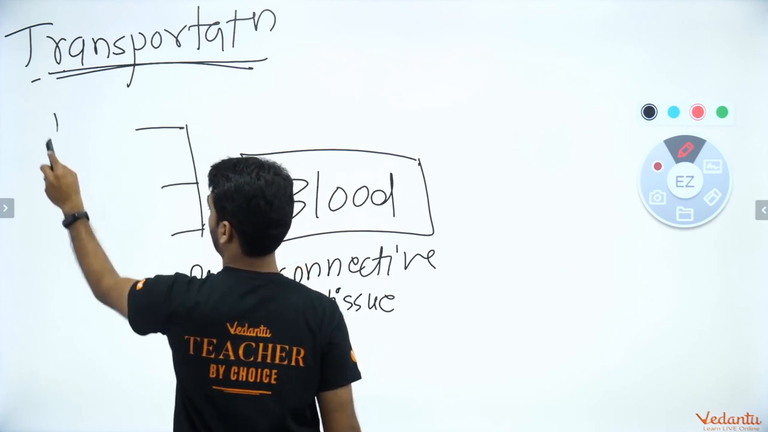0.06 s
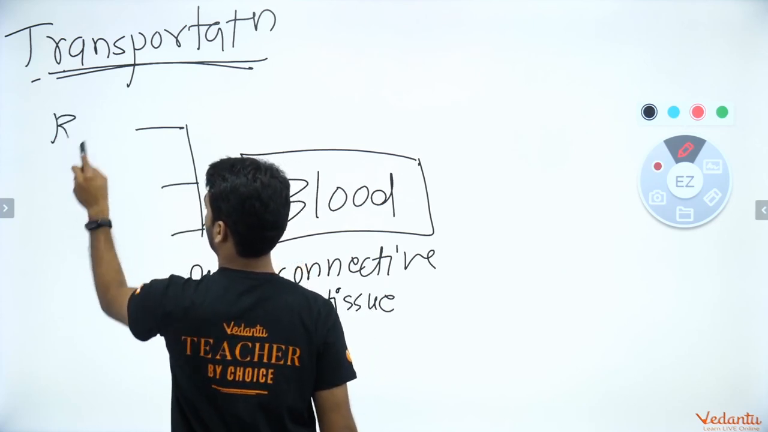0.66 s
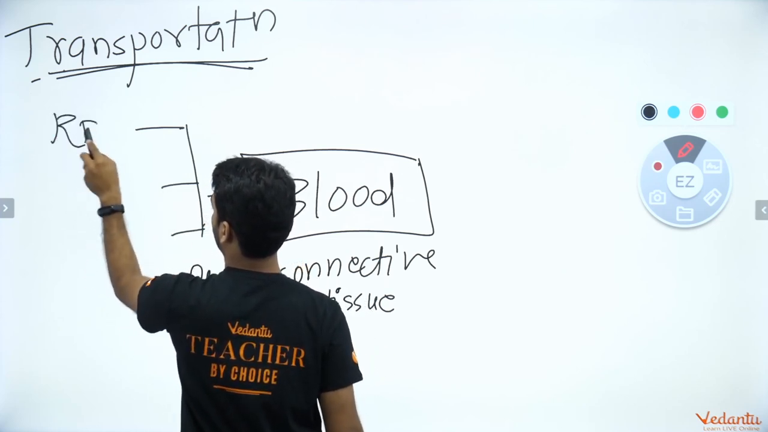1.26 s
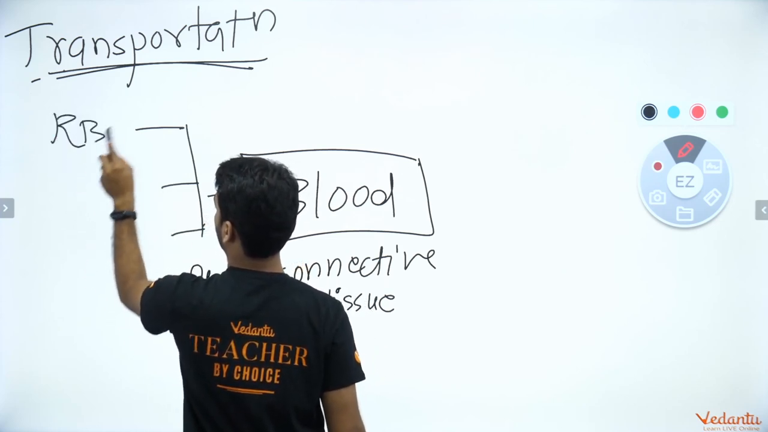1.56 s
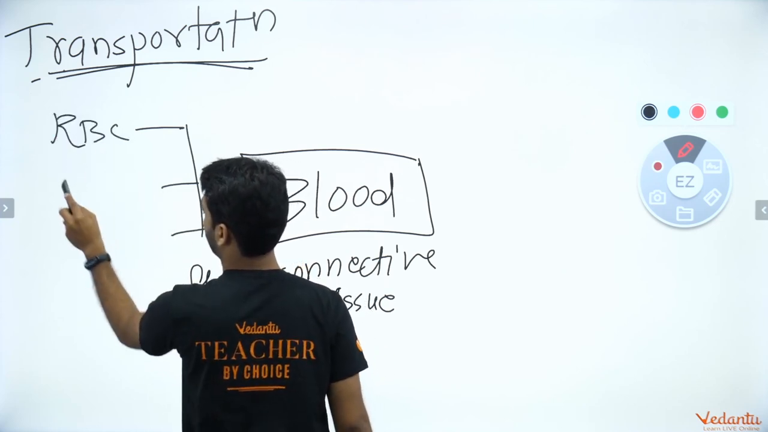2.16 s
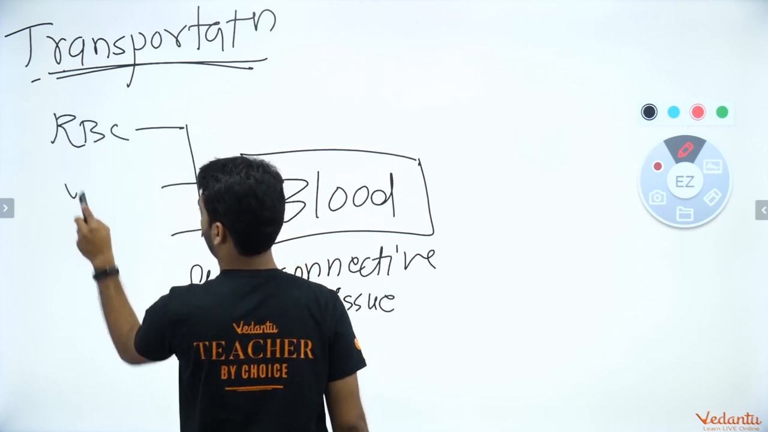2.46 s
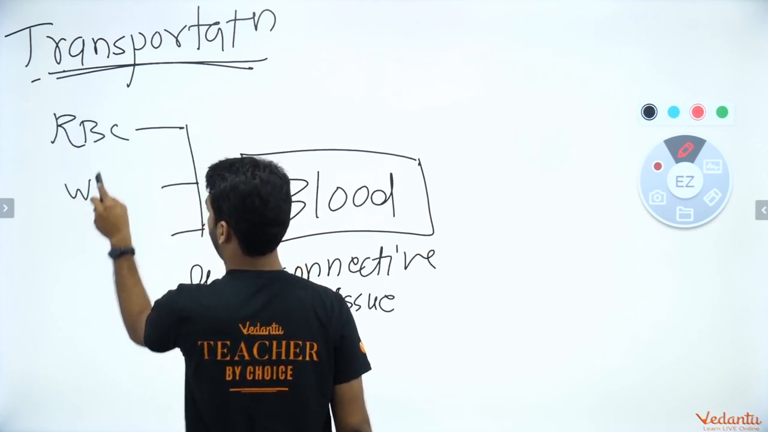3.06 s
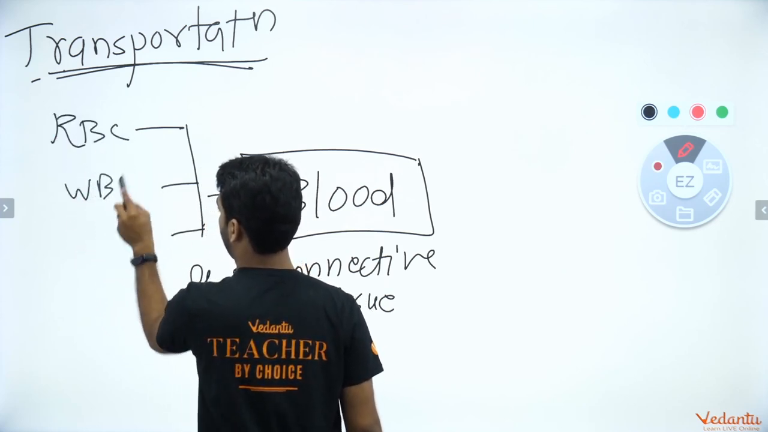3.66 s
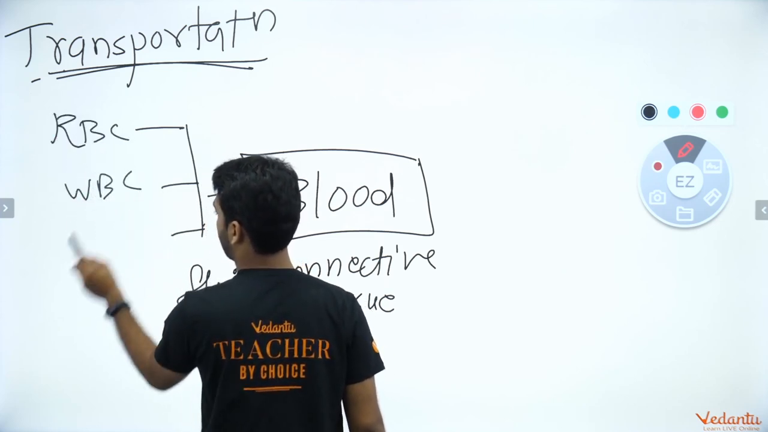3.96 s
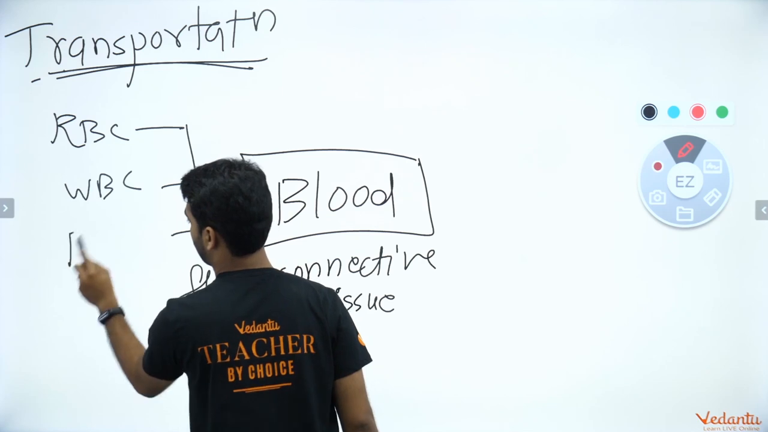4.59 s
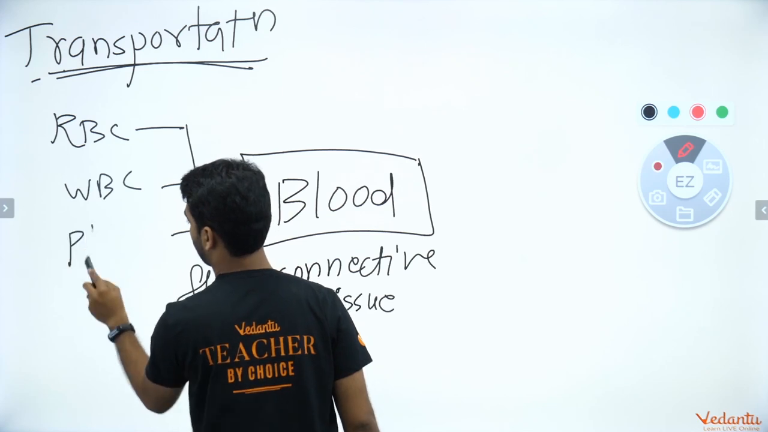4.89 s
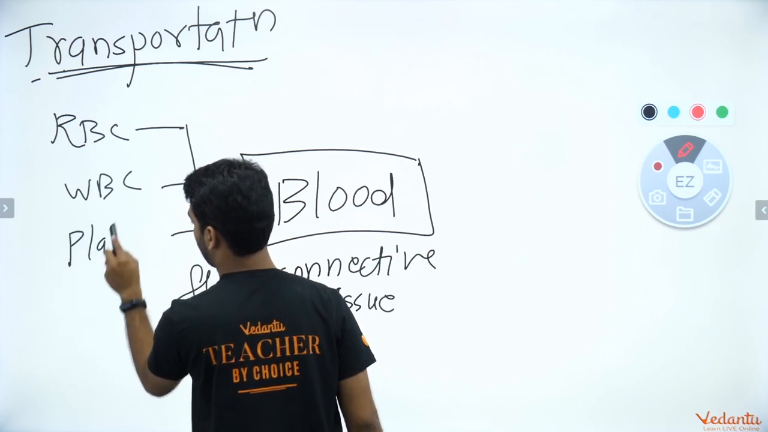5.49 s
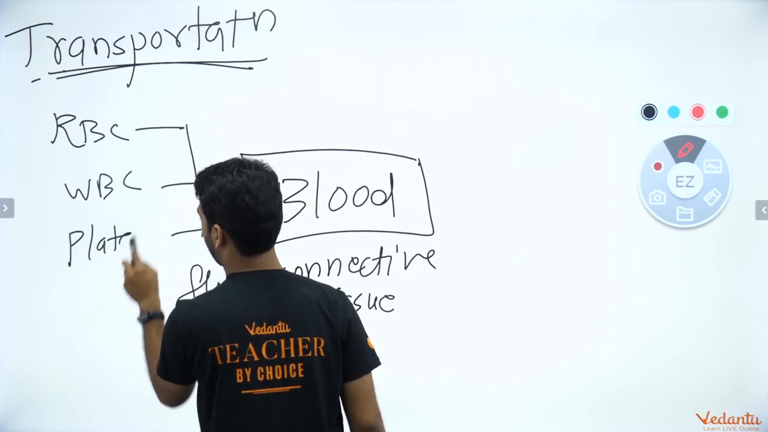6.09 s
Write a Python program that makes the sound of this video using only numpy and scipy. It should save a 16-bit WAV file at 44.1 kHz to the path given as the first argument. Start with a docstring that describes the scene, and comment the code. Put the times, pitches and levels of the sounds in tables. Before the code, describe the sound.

Close by, a pen tip knocks irregularly against a big board as letters are written one after another. Each clicking tap makes the panel resonate briefly and is followed by soft, scratchy strokes. The taps thin out a little in the middle and come closer together towards the end. Behind them is the faint, steady rumble and hum of classroom ventilation.

```python
"""A low hum and the dying boom of a large wall-mounted touch board sound in a quiet classroom.
Close by, a hard plastic stylus writes letters: friction makes its tip hiss faintly along each stroke.
Each touchdown is an impact that knocks the panel, clacks the pen's barrel and rattles its nib;
bending waves then spread, reflect from the frame and make the whole board boom briefly."""
import sys
import numpy as np
from scipy import signal
from scipy.fft import rfft, irfft, next_fast_len
from scipy.io import wavfile
from scipy.ndimage import map_coordinates

SR = 44100
rng = np.random.default_rng(int(sys.argv[2]) if len(sys.argv) > 2 else 0)


def pcm_store(signal):
    """Save signal as 16-bit PCM."""
    levels = np.round(np.clip(np.atleast_2d(signal), -1, 1) * 32767)
    wavfile.write(sys.argv[1], SR, levels.astype(np.int16).T)


N = 279281
T = np.arange(N) / SR
RING, SHORT = T[:SR], T[:SR // 16]  # seconds since an impact, for long and short decays

# spectrum of the ventilation: frequency_hz, density_db
AIR_SPECTRUM = [(20, -15), (40, -0.5), (58, -10), (80, 2.5), (105, -18.5), (160, -14.5), (250, -13.5),
                (350, -19.5), (550, -31.5), (800, -29), (1300, -38.5), (3000, -46), (8000, -50),
                (16000, -55.5)]
# spectrum of the dense ring of board and room: frequency_hz, density_db
BOOM_SPECTRUM = [(50, -23), (110, 2), (200, 0.5), (380, 0), (460, -4.5), (650, -6), (850, 1), (1080, -1.5),
                 (1300, -9), (1700, -16), (2200, -17), (2900, -22.5), (5500, -26), (9000, -31),
                 (15000, -26)]
# decay of that ring: frequency_hz, t60_s
BOOM_DECAY = [(100, 0.7), (400, 0.49), (900, 0.27), (2000, 0.29), (6000, 0.24), (14000, 0.037)]
# long modes of the whole board: pitch_hz, level_db, t60_s
BOARD_MODES = [(71.9, -37.5, 0.6), (116.4, -32, 0.84), (140.6, -33, 0.43), (197.6, -36.5, 1),
               (216.4, -30.5, 0.56), (230.7, -32, 0.52), (266.6, -37, 0.53), (293.2, -29.5, 0.43),
               (330, -53.5, 0.32), (376, -33.5, 0.38), (416.6, -39, 0.43), (524.5, -23, 0.16),
               (560, -44, 0.83), (750, -34.5, 0.32)]
# strokes of the sliding tip: start_s, end_s, level_db
STROKES = [(0.015, 0.174, -59), (0.327, .45, -56), (0.459, 0.555, -54.5), (0.575, 0.657, -57),
           (0.661, 0.792, -54), (0.928, 1.055, -59.5), (1.185, 1.294, -53.5), (1.3, 1.385, -59),
           (1.389, 1.478, -54), (1.495, 1.564, -54.5), (1.72, 1.84, -62), (1.829, 1.909, -51),
           (2.313, 2.767, -62), (2.932, 3.05, -60.5), (3.089, 3.21, -58.5), (3.208, 3.295, -54.3),
           (3.316, 3.383, -61), (3.389, 3.455, -52), (3.46, 3.547, -59.5), (3.74, 3.888, -53),
           (4.32, 4.46, -58.5), (4.594, 4.758, -58), (4.903, 5.027, -58.5), (5.18, 5.371, -60.5),
           (5.41, 5.493, -61.5), (5.672, 5.771, -55.5), (5.9, 6.2, -58)]
# spectra of the rubbed panel and the hissing tip: frequency_hz, density_db
RUB_SPECTRUM = [(300, -3), (750, 7), (1100, 0.5), (1400, 5), (1850, -10.5), (2150, -8), (2500, -8),
                (3050, -5.5), (4000, -16), (8000, -41), (16000, -20)]
HISS_SPECTRUM = [(2000, -56), (4200, -1), (5400, 0.5), (6000, 3), (7200, -15.5), (9400, 1.5), (10600, -6.5),
                 (11700, -4), (13000, -6), (15000, -6), (16000, -13)]
# gain of the hiss's top octave: time_s, gain_db
HISS_SHEEN = [(0, 6.5), (1.8, -6), (2.9, -2), (4.4, 7), (5.3, 0), (6.1, -1)]
# the sliding nib's resonance, shifting with the grip: time_s, pitch_hz
GRIP_PITCH = [(0, 6800), (1.8, 7230), (3.85, 7500), (4.3, 6620), (6.2, 6370)]
# touchdowns of the pen: start_s, force_db, ring_db, ring_hz, clack_db, crack_db, nib_hz, nib_db
TOUCHDOWNS = [(0.3104, -12, -37, 1130, 2.5, 1, 6050, -9), (0.9112, -8, -8.7, 890, 11, -11, 6160, 3),
              (1.1571, -7, -11, 890, -1.5, -0.5, 8400, -9.5), (1.7068, -8.5, -11.5, 855, 0, -2, 8500, -10),
              (2.2891, -8, -19, 1020, 1.5, 0.5, 6460, -4.5), (2.909, -5, -13, 816, -9, -0.5, 4900, -3.5),
              (3.7191, -4, -9.5, 845, 3.5, -1, 6200, 0.5), (4.2977, -7, -19, 970, 4.5, -5, 5500, 0),
              (4.5862, -5.5, -25, 955, 2.5, -23, 5170, 2), (4.8761, -5.5, -13, 935, -9, 6.5, 5700, -3),
              (5.1545, -5, -8.5, 898, -3.5, -6.5, 5960, 2.3), (5.649, -3, -8.5, 885, 3.5, 8, 6800, 4),
              (5.8861, -6, -7, 882, 0, -15, 5500, -1.5), (6.3147, -1.5, -12.5, 834, 2, 10.5, 6470, 3)]
# modes of the pen's barrel at medium contact stiffness: pitch_hz, level_db, t60_s
BARREL_MODES = [(1360, -14.5, 0.0063), (1726, -23, 0.0084), (1958, -23, 0.015)]
# spectra of the contact's crack, its sharp edge and the nib's rattle: frequency_hz, density_db
CRACK_SPECTRUM = [(1700, 1), (2300, -28), (2750, 7.5), (3800, 2), (4600, -2.5), (8000, -5), (15500, -27)]
EDGE_SPECTRUM = [(5000, -9.5), (10000, -1.5), (15000, -11), (16000, 2)]
RATTLE_SPECTRUM = [(2500, -33), (4200, -4), (5000, 10.5), (7700, 5), (9500, -1), (12000, -52), (15500, -11)]


def undb(db):
    """Decibels to amplitude gain."""
    return 10 ** (np.asarray(db) / 20)


def unit(x):
    """Scale to rms 1."""
    return x / np.sqrt(np.mean(x ** 2))


def along(points, hz):
    """Interpolate (frequency_hz, value) points on a log-frequency axis."""
    f, value = np.transpose(points)
    return np.interp(np.log(np.maximum(hz, 1)), np.log(f), value)


def colour(x, points):
    """Spectral shaping: filter x by (frequency_hz, gain_db) points."""
    size = next_fast_len(len(x))
    gain = undb(along(points, np.arange(size // 2 + 1) * SR / size))
    return irfft(rfft(x, size) * gain, size)[:len(x)]


def resonate(x, hz, width_hz):
    """A second-order resonance, gain 1 at its centre."""
    return signal.lfilter(*signal.iirpeak(hz, hz / width_hz, fs=SR), x)


def fade(t, t60):
    """Exponential decay, 60 dB down after t60 seconds."""
    return np.exp(-np.log(1000) * t / t60)


def mode(t, hz, t60):
    """Damped free vibration; the blow pushes inwards first."""
    return -np.sin(2 * np.pi * hz * t) * fade(t, t60)


def burst(points, t60):
    """A transient of shaped noise with exponential decay."""
    return unit(colour(rng.standard_normal(len(SHORT)), points)) * fade(SHORT, t60)


def walk(rate):
    """Random fluctuation through `rate` points a second, spread near 1."""
    return 1.2 * np.interp(T * rate, np.arange(N // 64), rng.standard_normal(N // 64))


def add(out, start_s, x):
    """Superpose x on out from start_s."""
    i = int(round(start_s * SR))
    out[i:i + len(x)] += x[:len(out) - i]


def ventilation(air_db=-41, hum_db=-49, hum_hz=72.9, swell_db=1, waver_db=3):
    """Broadband rumble under a low hum that wavers by amplitude and phase modulation."""
    air = unit(colour(rng.standard_normal(N), AIR_SPECTRUM)) * undb(swell_db * walk(3.53))
    phase = 2 * np.pi * hum_hz * T + walk(3.8)
    hum = unit(np.sin(phase) * undb(waver_db * walk(5)))
    return undb(air_db) * air + undb(hum_db) * hum


def board_boom(dense_db=-23, modes_db=-1, spread_s=0.0024, fill_s=0.014, place_db=2):
    """Bending waves reflect from the frame into standing waves, weighted by the spot that is struck."""
    spectrum = rfft(unit(colour(rng.standard_normal(len(RING)), BOOM_SPECTRUM)))
    hz = np.maximum(np.arange(len(spectrum)) * SR / len(RING), 1)
    dense, modes = np.zeros((2, len(RING)))
    for centre_hz in 62.5 * 2. ** np.arange(9):
        octave = np.maximum(1 - abs(np.log2(hz / centre_hz)), 0)
        dense += irfft(spectrum * octave, len(RING)) * fade(RING, along(BOOM_DECAY, centre_hz))
    for pitch_hz, level_db, t60 in BOARD_MODES:
        weight = rng.choice([-1, 1]) * undb(level_db + place_db * rng.standard_normal())
        modes += weight * mode(RING, pitch_hz, t60)
    dense *= 1 - np.exp(-RING / spread_s)
    modes *= 1 - np.exp(-RING / fill_s)  # dispersion: slow, low waves fill the long modes last
    return undb(dense_db) * dense + undb(modes_db) * modes


def friction(pressure_db=2.7, rub_db=0.7, hiss_db=-7, sheen_hz=10500,
             nib_db=-5, width_hz=1100, glide_hz=200, upper_ratio=1.25, upper_db=-7):
    """Surface roughness excites the panel's rub, the tip's hiss and two wandering nib resonances."""
    bumps = rng.standard_normal((4, N)) * undb(pressure_db * walk(26))
    rub = undb(rub_db) * unit(colour(bumps[0], RUB_SPECTRUM))
    hiss = undb(hiss_db) * unit(colour(bumps[1], HISS_SPECTRUM))
    treble = signal.sosfiltfilt(signal.butter(3, sheen_hz, "high", fs=SR, output="sos"), hiss)
    hiss += (undb(np.interp(T, *np.transpose(HISS_SHEEN))) - 1) * treble
    # narrowband noise, shifted up to each resonance
    flutter = signal.lfilter(*signal.butter(2, width_hz / 2, fs=SR), bumps[2] + 1j * bumps[3])
    nib_hz = np.interp(T, *np.transpose(GRIP_PITCH)) + glide_hz * walk(33)
    phase = 2 * np.pi * np.cumsum(nib_hz) / SR
    lower = flutter * np.exp(1j * phase)
    upper = undb(upper_db) * flutter[::-1] * np.exp(1j * upper_ratio * phase)
    return rub + hiss + undb(nib_db) * unit(np.real(lower + upper))


def sliding(ramp_s=0.012, swing_db=2.5, lean_db=1, hand_db=-9, room_db=-5):
    """Friction noise follows each stroke; a second path past the moving hand comb-filters it."""
    noise = friction()
    out = np.zeros(N)
    for start_s, end_s, level_db in STROKES:
        span = slice(int(start_s * SR), int(end_s * SR))
        t = T[span] - T[span][0]
        gate = np.clip(np.minimum(t, t[-1] - t) / ramp_s, 0, 1)
        progress = t / t[-1]
        # the hand is fastest in mid stroke and leans in towards the end
        effort_db = swing_db * (np.sin(np.pi * progress) - 1) + lean_db * (progress - .5)
        stroke = undb(level_db + effort_db) * gate * noise[span]
        lag_samples = np.linspace(*rng.uniform(20, 60, 2), len(t))
        delayed = map_coordinates(stroke, [np.arange(len(t)) - lag_samples])
        add(out, start_s, stroke + undb(hand_db) * delayed)
    return out + undb(room_db) * room(out, t60=0.15)


def room(x, t60):
    """Reverberation: the classroom walls return a diffuse field that decays exponentially."""
    walls = rng.standard_normal(len(RING)) * fade(RING, t60)
    return signal.fftconvolve(x, walls / np.linalg.norm(walls))[:N]


def panel_knock(force_db, ring_db, ring_hz, clack_db,
                contact_s=0.00053, dent_db=-7, low_db=-21, swell_s=0.0025):
    """Impact excitation: a half-sine pulse dents the panel, and the modes of panel and barrel ring."""
    mid_force_db, sag_hz_per_db = -4.5, 27  # a harder tap stays longer on the panel and knocks lower
    knock_hz = 1078 - sag_hz_per_db * (force_db - mid_force_db)
    dent = -np.sin(np.pi * np.minimum(SHORT / contact_s, 1))
    low = mode(SHORT, hz=510, t60=0.075)
    knock = undb(dent_db) * dent + mode(SHORT, knock_hz, t60=0.011) + undb(low_db) * low
    swell = (SHORT / swell_s * np.exp(1 - SHORT / swell_s)) ** 2
    ring = -np.sin(2 * np.pi * ring_hz * SHORT) * swell
    stiffening = (knock_hz / 1050) ** 0.49  # a stiffer contact raises the clack along with the knock
    clack = sum(undb(db + rng.standard_normal()) * mode(SHORT, hz * stiffening, t60)
                for hz, db, t60 in BARREL_MODES)
    body = undb(force_db) * knock + undb(ring_db) * ring + undb(clack_db) * clack
    cutoff_hz = 2400 * stiffening  # the sprung tip cushions the blow
    return signal.sosfilt(signal.butter(7, cutoff_hz, fs=SR, output="sos"), body)


def nib_tick(crack_db, nib_hz, nib_db, sharp_db, width_hz=1700, rattle_db=-19, tone_db=-22):
    """Hard contact is broadband: the nib cracks on the glass, then rattles and resonates in its holder."""
    crack = undb(crack_db - 25) * burst(CRACK_SPECTRUM, t60=0.025)
    edge = undb(sharp_db - 25) * burst(EDGE_SPECTRUM, t60=0.017)
    noise = rng.standard_normal(len(SHORT))
    band = resonate(resonate(noise, nib_hz, width_hz), nib_hz, width_hz)
    tone = undb(tone_db) * unit(band) * fade(SHORT, t60=0.027)
    rattle = undb(rattle_db) * burst(RATTLE_SPECTRUM, t60=0.0086)
    return crack + edge + undb(nib_db) * (rattle + tone)


def taps(echo_db=-17, echo_s=0.0055, room_db=-14):
    """Superposition: each touchdown gives a knock, its reflection from the frame, a boom and a tick."""
    board, ticks = np.zeros((2, N))
    for start_s, force_db, ring_db, ring_hz, clack_db, crack_db, nib_hz, nib_db in TOUCHDOWNS:
        knock = panel_knock(force_db, ring_db, ring_hz, clack_db)
        add(board, start_s, knock)
        add(board, start_s + echo_s * rng.uniform(0.773, 1.7), undb(echo_db) * knock)
        boom_db = 0.07 + 0.26 * nib_db  # the boom grows a little with the nib's impact
        add(board, start_s, undb(boom_db) * board_boom())
        sharp_db = 0.49 * nib_db + 0.57 * clack_db  # jolting nib and barrel sharpens the tick
        add(ticks, start_s, nib_tick(crack_db, nib_hz, nib_db, sharp_db))
    add(board, 0, board_boom()[SR // 12:])  # the board is already ringing at the start
    return board + ticks + undb(room_db) * room(ticks, t60=0.23)


def scene():
    """The sound pressures of pen, board and room add at one microphone."""
    return (taps() + sliding() + ventilation())[None]


def record(dry, cutoff_hz=15500):
    """Clipping limits peaks to full scale; a steep low-pass filter then limits the bandwidth."""
    lowpass = signal.ellip(10, .2, 85, cutoff_hz, fs=SR, output="sos")
    return signal.sosfilt(lowpass, np.clip(dry, -1, 1))


dry = scene()
out = record(dry)
pcm_store(out)
```